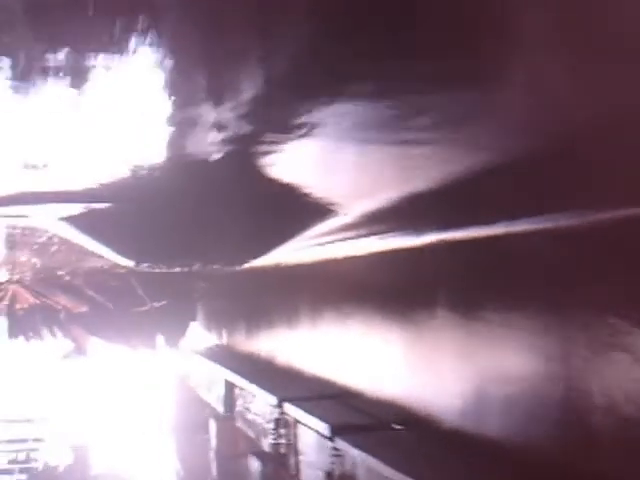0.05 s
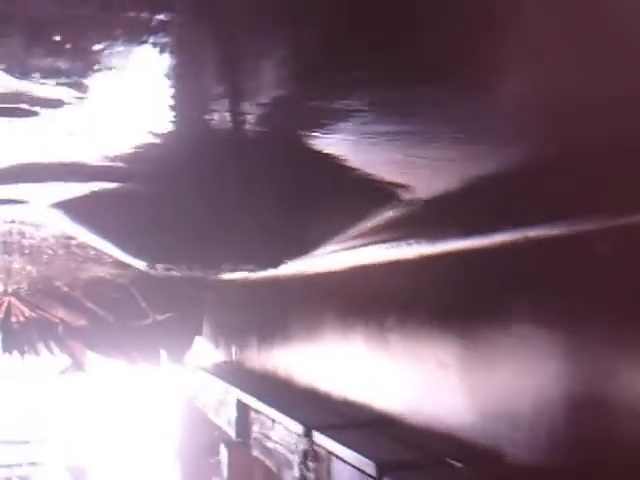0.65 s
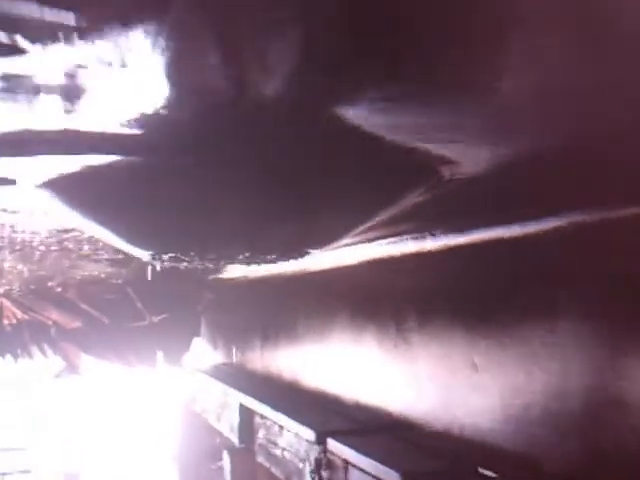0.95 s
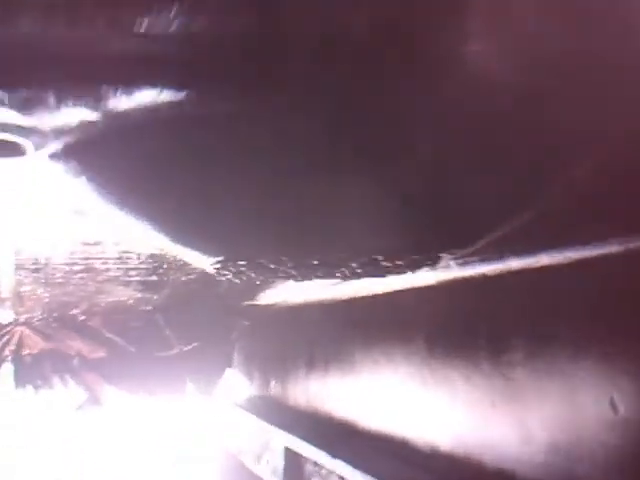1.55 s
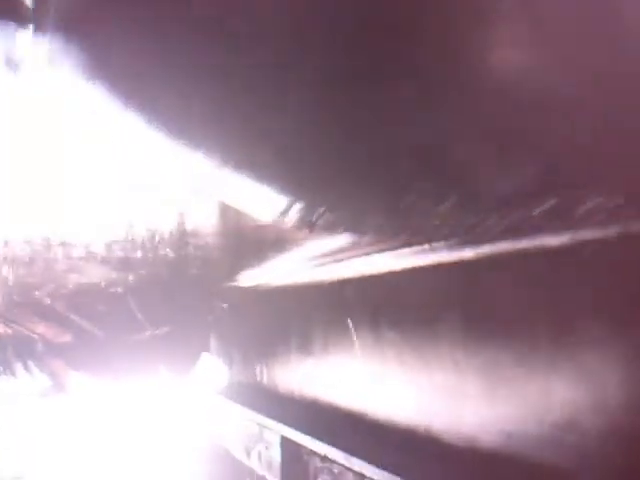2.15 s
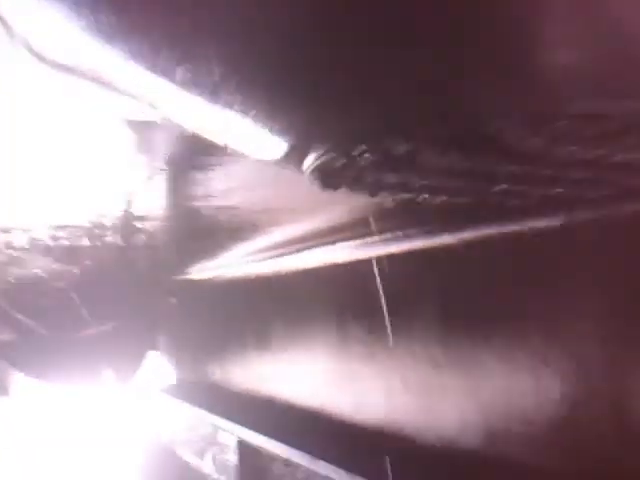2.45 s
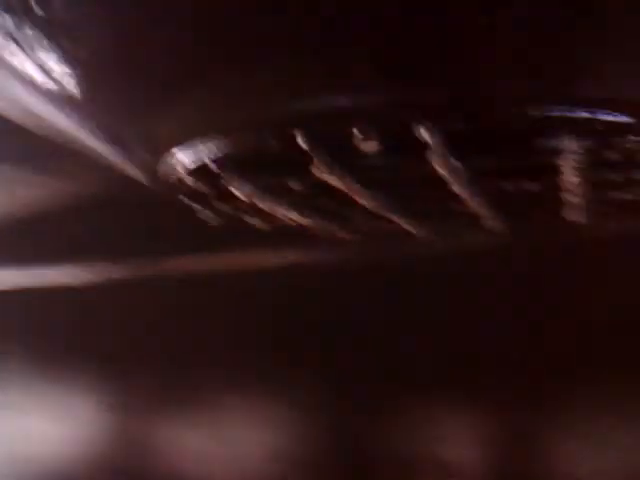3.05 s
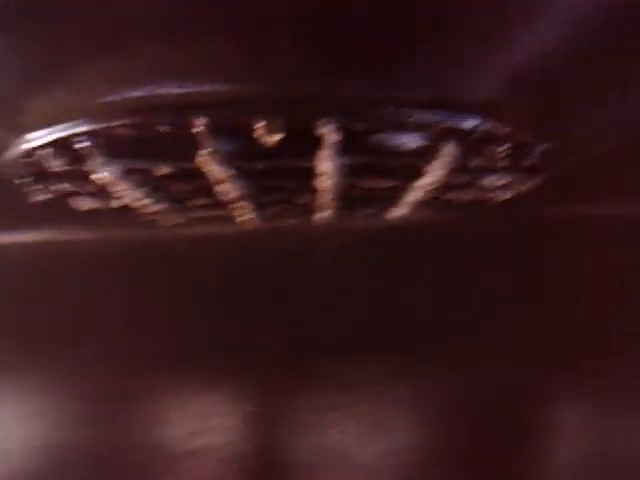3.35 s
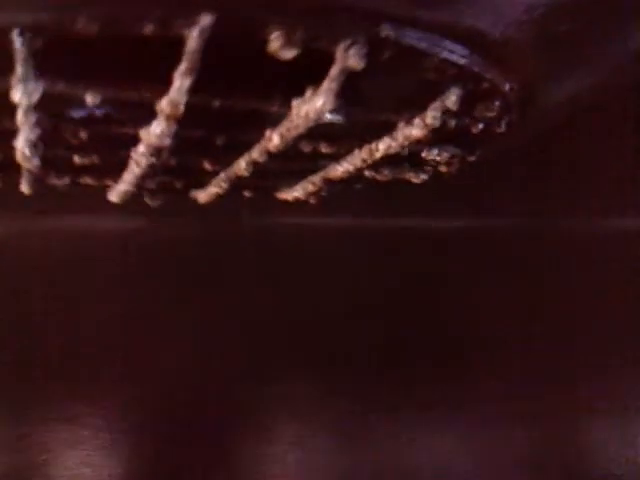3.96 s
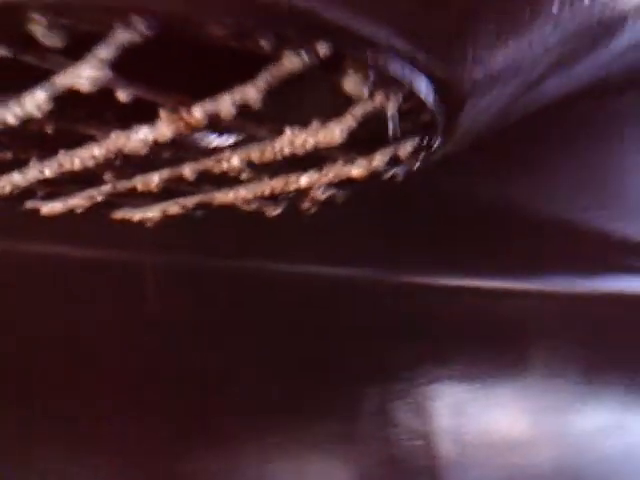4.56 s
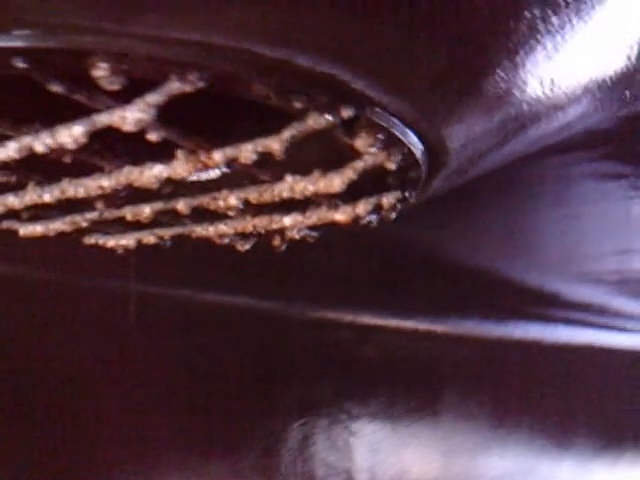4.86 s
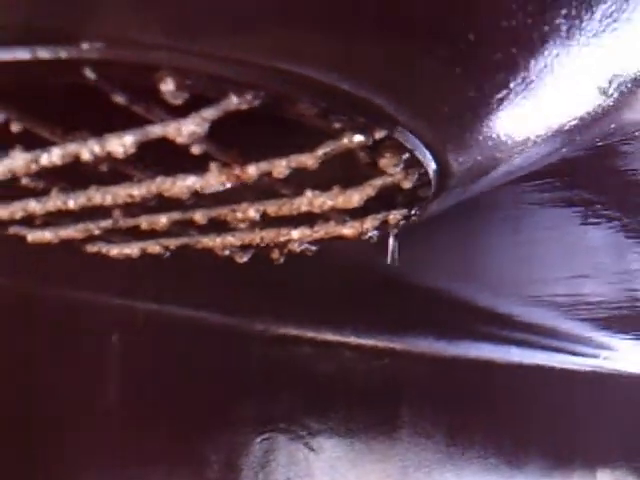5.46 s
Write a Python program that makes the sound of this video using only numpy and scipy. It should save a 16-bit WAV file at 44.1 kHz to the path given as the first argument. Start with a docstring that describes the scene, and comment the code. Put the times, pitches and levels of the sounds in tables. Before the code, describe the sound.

In a shed, a quiet low rumble and airy wash run under irregular, faint splashes of water falling from a boat hull overhead. A very loud, booming clatter on the hull breaks in, distorting harshly on the microphone and echoing briefly. A few more drips land, then a softer, hollow knock sounds on the hull, leaving only the rumble and occasional drips.

```python
"""Water drips and splashes on the floor of an echoing shed, over a steady low rumble.
It falls from a wet boat hull, hauled out overhead. Halfway through comes a heavy, clattering
bang, then a duller knock: blows shake the hull's panels, and the shed echoes them.
The bang is too big for a small camera's converter (the part that turns sound into numbers),
so its highest peaks become a harsh crackle."""
import sys
import numpy as np
from scipy import signal
from scipy.fft import rfft, irfft, next_fast_len
from scipy.io import wavfile
from scipy.ndimage import map_coordinates

SR = 44100
rng = np.random.default_rng(int(sys.argv[2]) if len(sys.argv) > 2 else 0)


def transcribe(u):
    """Save the signal u as a 16-bit wav file named by the first command-line argument.

    u: samples, shape (n,) or (channels, n), limited to [-1, 1]; the rate is SR.
    q: integer samples, one column per channel.
    """
    v = np.clip(np.atleast_2d(u).T, -1, 1)
    q = np.round(v * 32767).astype(np.int16)
    wavfile.write(sys.argv[1], SR, q)


N = 243431

# The tone of each sound, from bass to treble. Each row: frequency in Hz, relative level in dB.
RUMBLE_TONE = [(8.8, -45), (15, 8), (54, -7.5), (77, -6.5), (97, -12.5), (155, -11), (189, -17.5),
               (298, -19.5), (334, -28), (450, -41), (580, -45), (990, -120)]
AIR_TONE = [(200, -7.5), (350, 1), (550, -1.5), (900, -1.5), (1250, -9.5), (1750, -11.5), (2150, -21),
            (3100, -20.5), (4300, -35.5), (5500, -26.5), (6600, -38.5), (8500, -37), (10300, -40),
            (11000, -59.5)]
SLAP_TONE = [(600, -16), (1600, -2.5), (2700, -2), (3400, -7), (4200, -23.5), (9000, -37)]
SPRAY_TONE = [(2000, -11), (4300, -3), (5600, 0.5), (6700, -2), (8300, 0), (10300, -12.5), (11000, -51.5)]
KNOCK_TONE = [(25, 7), (70, -2), (125, 6), (250, -3.5), (450, -4.5), (680, -1.5), (920, -1), (1130, -8.5),
              (1780, -6.5), (2100, -21.5), (3400, -30.5), (4300, -43), (5600, -32), (6700, -40.5),
              (8300, -41), (10500, -69)]
BANG_TONE = [(20, 3.5), (80, -3), (135, 0.5), (175, -4.5), (212, -1), (245, -2), (295, 1), (420, -6),
             (950, -8.5), (1200, -17), (1700, -9.5), (2350, -28), (3400, -28.5), (4300, -40), (5700, -41),
             (8300, -48), (10300, -58), (11000, -84)]
# The shed's echo. Each row: frequency in Hz, fade time in seconds (every fade here is a 60 dB drop).
SHED_FADES = [(40, 0.37), (150, 1.32), (400, 0.82), (850, 0.91), (1200, 0.81), (1700, 0.81), (2400, 0.93),
              (4000, 0.71), (5600, 0.68), (9000, 0.19)]
# The background's rise and fall. Each row: time in seconds, level in dB.
BACKGROUND_LEVELS = [(0, -47.5), (.4, -48.5), (1.4, -45.5), (2.5, -44), (3.2, -48.5), (4.05, -49),
                     (4.8, -51.5), (5.52, -47.5)]
# Where the hollow under the hull rings. Each row: pitch in Hz, width in Hz, level in dB.
HOLLOW_PITCHES = [(843, 230, 1), (1685, 290, -8)]
# Moments when that ring swells. Each row: time of the peak in seconds, level in dB.
HOLLOW_SWELLS = [(0.05, -53), (2.5, -48), (3.08, -51.5), (4.05, -50), (4.55, -49.5), (5.48, -52)]
# An electrical whine. Each row: pitch in Hz, level in dB.
WHINE_TONES = [(5114, -81.5), (10228, -87)]
# Splashes on the floor. Each row: start in seconds, slap in dB, spray in dB, rise time in seconds.
DRIPS = [(0.02, -49.5, -79, 0.00051), (0.399, -63, -62, 0.0015), (0.446, -44.5, -58.5, 0.0097),
         (1.024, -52, -53, 0.042), (1.754, -51.5, -79, 0.0091), (3.103, -47.5, -70, .012),
         (3.173, -53, -78, 0.0013), (3.449, -42.5, -54, 0.018), (3.585, -57, -67, 0.0056),
         (4.593, -51.5, -64, 0.01), (5.32, -54, -58.5, 0.0046)]
# Three blows, then the faint, dull thud of a drip landing.
# Each row: start in seconds, level in dB, extra bass in dB.
KNOCK_BLOWS = [(4.124, -19.5, -8), (4.138, -15, -2.5), (4.158, -17.5, -0.5), (4.595, -42.5, -21)]
# The bang's blows. Each row: start in seconds, level in dB, extra bass in dB,
# peak of the hard contact in dB, fade time of that contact in seconds.
BANG_BLOWS = [(2.5757, -16, 2, -4.5, .015), (2.5815, -18.5, 0, -5, 0.058), (2.5934, -12.5, 0.5, -5, .055),
              (2.607, -15.5, -3.5, -5, .052), (2.6292, -16, -6.5, -8, .045), (2.6419, -21.5, -5, -2, .009),
              (2.6869, -23, 6.5, 6.5, 0.0036), (2.722, -20.5, 2, -31, 0.0084), (2.80, -41, -12.5, -50, .01)]
# The bang's last dull bump: time of its middle in seconds, pressure as a plain number, length in seconds.
LAST_BUMP = (2.84, -.19, .016)
# The treble drops steeply above 11 kHz; a faint digital sizzle remains at 13-15 kHz.
# Each row: frequency in Hz, gain in dB.
TREBLE_DROP = [(20, 0.5), (6000, -1.5), (10800, -1), (12000, -40), (13000, -18.5), (15200, -21.5),
               (15900, -41)]


def amp(db):
    """Turn decibels into a number to multiply by."""
    return 10 ** (np.asarray(db) / 20)


def unit(x):
    """Scale a sound to an average (rms) level of 1."""
    return x / np.sqrt(np.mean(x ** 2) + 1e-20)


def along(table, hz):
    """Read between a table's rows on a log frequency scale."""
    frequencies, values = np.transpose(table)
    return np.interp(np.log(hz + 1), np.log(frequencies + 1), values)


def filtered(x, gain):
    """Turn each frequency up or down by gain(hz)."""
    size = next_fast_len(len(x) + 8192)
    return irfft(rfft(x, size) * gain(np.fft.rfftfreq(size, 1 / SR)), size)[:len(x)]


def noise(tone, size):
    """Noise with the given tone, at level 1."""
    return unit(filtered(rng.standard_normal(size), lambda hz: amp(along(tone, hz))))


def wobble(rate):
    """A smooth curve through `rate` random points a second."""
    return map_coordinates(rng.standard_normal(256), [np.arange(N) * rate / SR], mode="wrap")


def add(track, start_s, sound):
    """Mix a sound into the track."""
    start = max(round(start_s * SR), 0)
    part = sound[:len(track) - start]
    track[start:start + len(part)] += part


def rounded(x, ceiling):
    """Round off the largest swings so they stay below a ceiling."""
    return x / (1 + (x / ceiling) ** 8) ** (1 / 8)


def shed_echo(x, stretch):
    """Each frequency dies away over the shed's own fade time, multiplied by stretch."""
    hz, t, spectrum = signal.stft(x, SR, nperseg=512)
    fade_s = stretch * along(SHED_FADES, hz)[:, None]
    return signal.istft(spectrum * amp(-60 * t / fade_s), SR, nperseg=512)[1][:len(x)]


def hollow_ring(size):
    """The hollow under the hull picks two broad pitches out of noise."""
    def gain(hz):
        return sum(amp(db) / (1 + (2 * (hz - pitch) / width) ** 2)
                   for pitch, width, db in HOLLOW_PITCHES)
    return unit(filtered(rng.standard_normal(size), gain))


def background(waver_db=1.2, swell_width_s=0.16):
    """Rumble, airy wash, hiss and hollow ring rise and fall together; the ring also swells alone."""
    t = np.arange(N) / SR
    level = amp(np.interp(t, *np.transpose(BACKGROUND_LEVELS)))
    rumble = amp(16 + waver_db * wobble(rate=7.6)) * noise(RUMBLE_TONE, N)
    air = noise(AIR_TONE, N)
    hiss = amp(-24.5) * noise(SPRAY_TONE, N)
    swells = sum(amp(db) * np.exp(-((t - peak) / swell_width_s) ** 2) for peak, db in HOLLOW_SWELLS)
    ring = np.hypot(level * amp(-10.5), swells) * hollow_ring(N)
    return level * (rumble + air + hiss) + ring


def whine():
    """A faint electrical whine of two steady, high tones."""
    t = np.arange(N) / SR
    return sum(amp(db) * np.sqrt(2) * np.sin(2 * np.pi * hz * t) for hz, db in WHINE_TONES)


def splash(tone, rise_s, fade_s, echo_db, stretch):
    """A swelling burst of tiny droplets, followed by its echo."""
    size = SR // 2
    t = np.arange(size) / SR
    droplet_db = 4 * np.repeat(rng.standard_normal(size // 90), 90)  # a new level every 2 ms
    spatter = noise(tone, size) * unit(amp(droplet_db)) * amp(-60 * t / fade_s)
    echo = amp(echo_db) * shed_echo(noise(tone, size), stretch)
    return (spatter + echo) * (1 - np.exp(-t / rise_s))


def drips():
    """Falling water slaps the wet floor and throws up a fine spray; a moment later both land again, softer."""
    track = np.zeros(N)
    for start, slap_db, spray_db, rise_s in DRIPS:
        for delay_s, landing_db in [(0, 0), (0.034, -12)]:  # first and second landing
            slap = splash(SLAP_TONE, rise_s, fade_s=0.16, echo_db=-4.5, stretch=0.8)
            spray = splash(SPRAY_TONE, rise_s, fade_s=0.37, echo_db=1.5, stretch=0.95)
            add(track, start + delay_s, amp(landing_db) * (amp(slap_db) * slap + amp(spray_db) * spray))
    return track


def blows(rows, tone, fade_s, echo_db, stretch, bass_hz, rise_s):
    """Each blow shakes a panel at many pitches at once; they die quickly and leave the shed's echo."""
    track = np.zeros(N)
    t = np.arange(round(1.5 * SR)) / SR
    rise = 1 - np.exp(-t / rise_s)
    for start, db, bass_db, *_ in rows:
        bass_gain = lambda hz: amp(bass_db / (1 + (hz / bass_hz) ** 4))
        ring = filtered(noise(tone, len(t)), bass_gain) * amp(-60 * t / fade_s)
        echo = shed_echo(filtered(noise(tone, len(t)), bass_gain), stretch)
        add(track, start, amp(db) * (ring + amp(echo_db) * echo) * rise)
    return track


def knock(ring_db=-5.5, ring_fade_s=0.43):
    """A softer, wooden triple knock; the hollow under the hull rings on after the hardest blow."""
    track = blows(KNOCK_BLOWS, KNOCK_TONE, fade_s=0.19, echo_db=-6, stretch=1.01,
                  bass_hz=280, rise_s=0.00083)
    start, db, _ = max(KNOCK_BLOWS, key=lambda row: row[1])
    t = np.arange(SR) / SR
    add(track, start, hollow_ring(SR) * amp(db + ring_db - 60 * t / ring_fade_s))
    return rounded(track, ceiling=0.41)


def bang(contact_hz=717.4, pitch_scatter=0.23):
    """A heavy clatter: a squashed boom, hard contacts that overload the converter, then a dull bump."""
    boom = blows(BANG_BLOWS, BANG_TONE, fade_s=0.36, echo_db=-1.5, stretch=0.8,
                 bass_hz=330, rise_s=0.0011)
    track = rounded(boom, ceiling=0.45)
    t = np.arange(SR // 10) / SR
    for start, _, _, contact_db, fade_s in BANG_BLOWS:  # each contact jolts the panel for a few swings
        pitch = contact_hz * np.exp(pitch_scatter * rng.standard_normal())
        add(track, start, amp(contact_db - 60 * t / fade_s) * np.sin(2 * np.pi * pitch * t))
    middle, pressure, length = LAST_BUMP
    add(track, middle - length / 2, pressure * np.hanning(round(length * SR)))  # one smooth push
    return rounded(track, ceiling=0.64)


def scene():
    """Everything reaches one microphone."""
    return (bang() + knock() + drips() + background() + whine())[None]


def record(dry):
    """Peaks past the converter's limit of 0.5 flip to the opposite sign; the treble is then cut off."""
    wrapped = (dry[0] + 0.5) % 1 - 0.5
    top_hz = 15900
    return filtered(wrapped, lambda hz: amp(along(TREBLE_DROP, hz)) * (hz < top_hz))[None]


dry = scene()
out = record(dry)
transcribe(out)
```